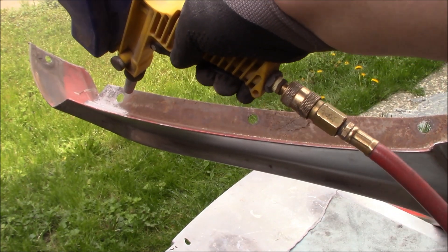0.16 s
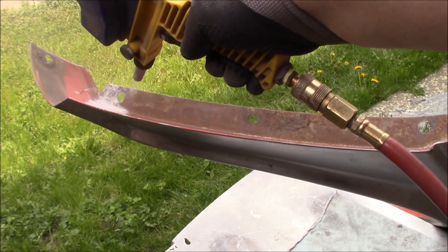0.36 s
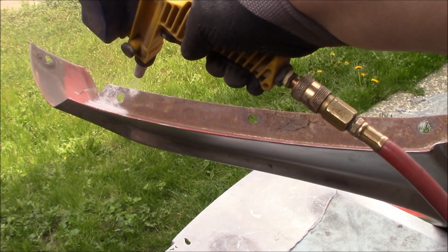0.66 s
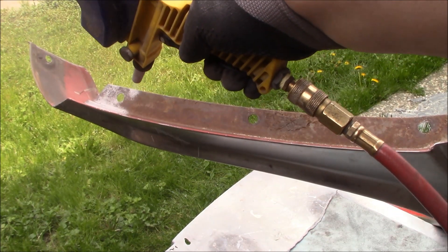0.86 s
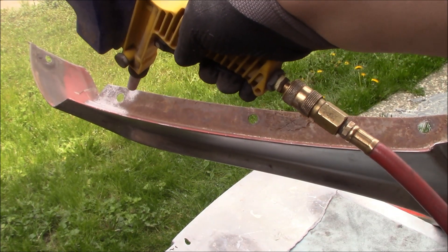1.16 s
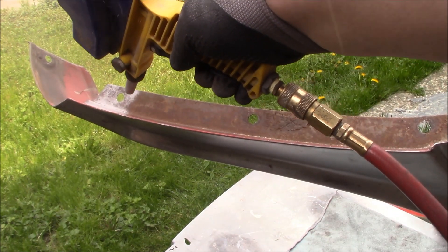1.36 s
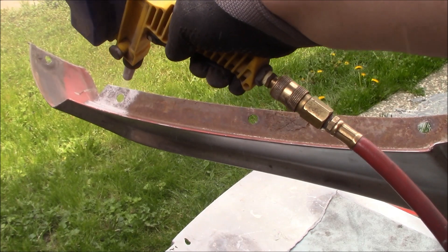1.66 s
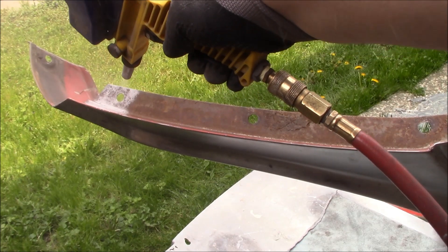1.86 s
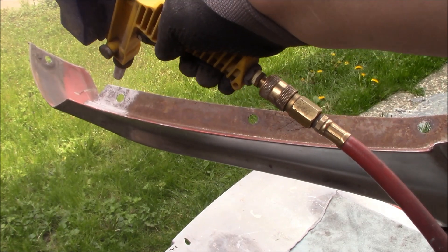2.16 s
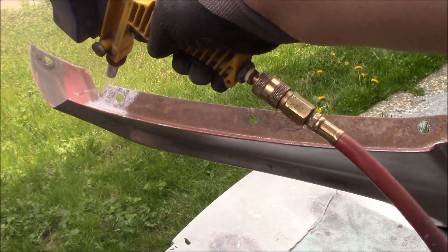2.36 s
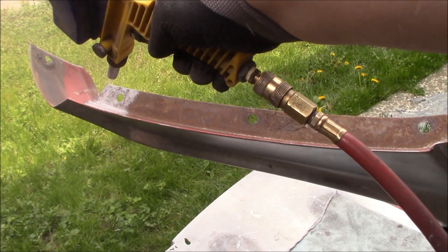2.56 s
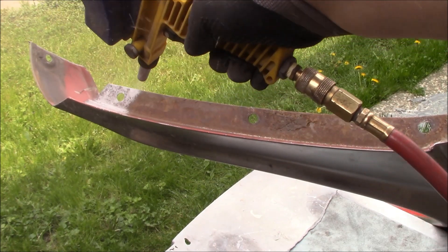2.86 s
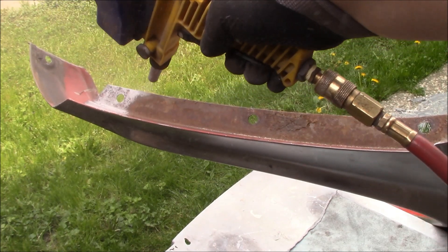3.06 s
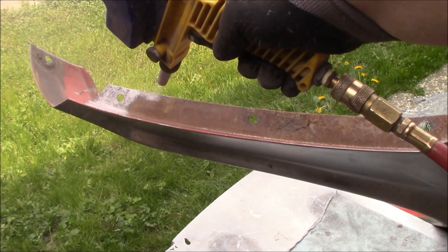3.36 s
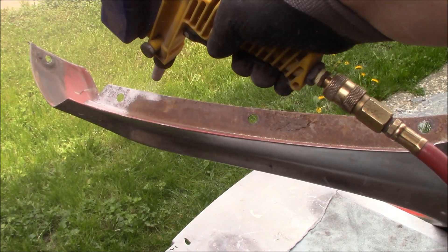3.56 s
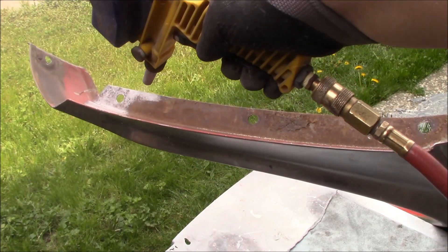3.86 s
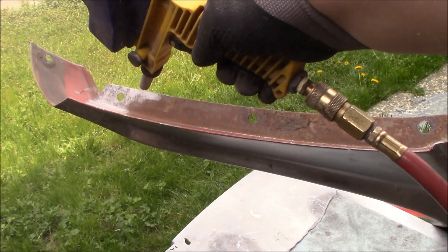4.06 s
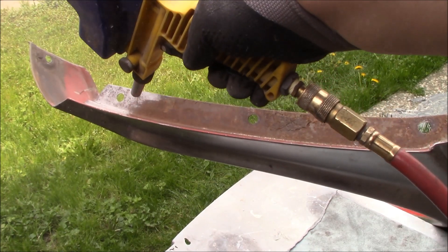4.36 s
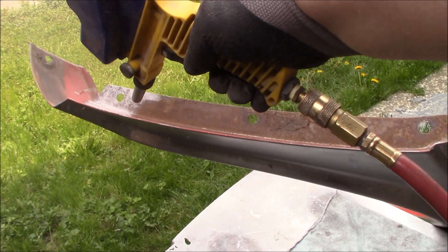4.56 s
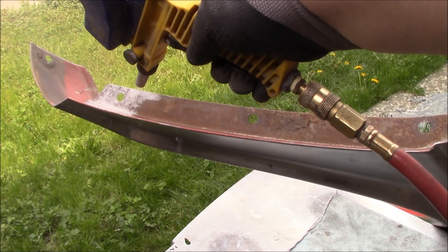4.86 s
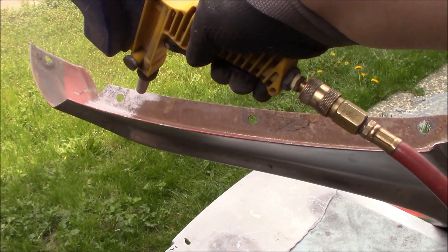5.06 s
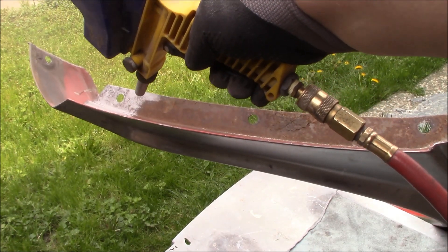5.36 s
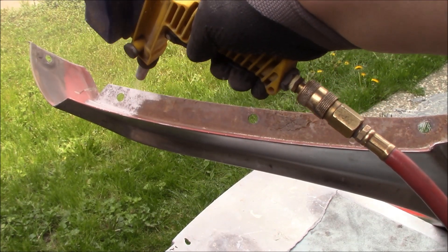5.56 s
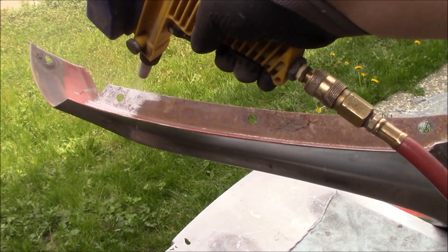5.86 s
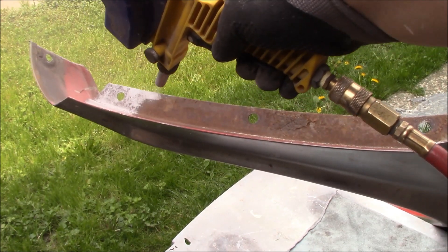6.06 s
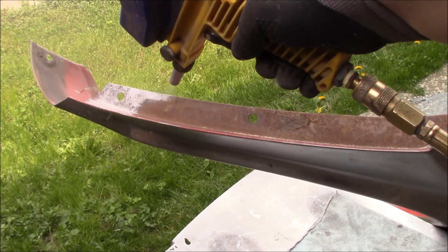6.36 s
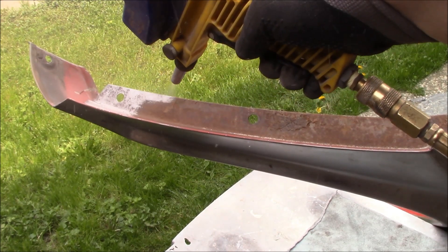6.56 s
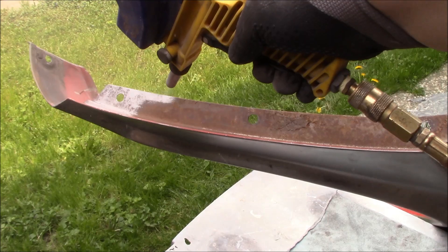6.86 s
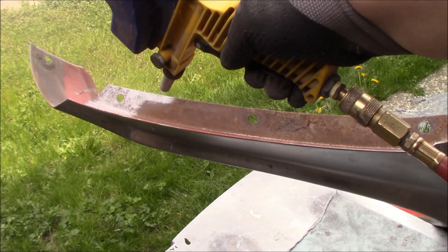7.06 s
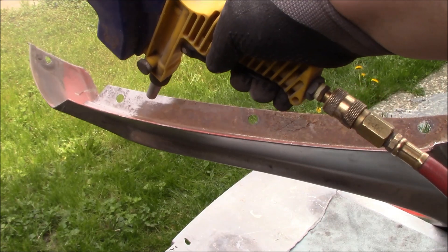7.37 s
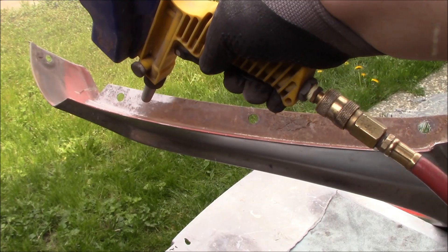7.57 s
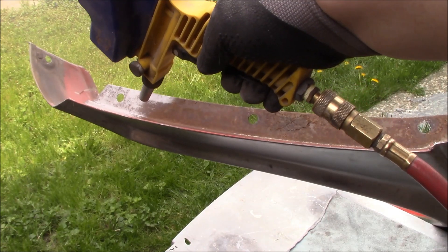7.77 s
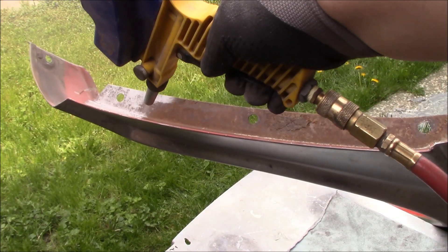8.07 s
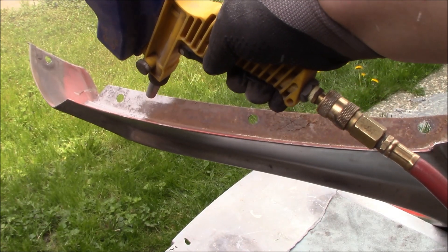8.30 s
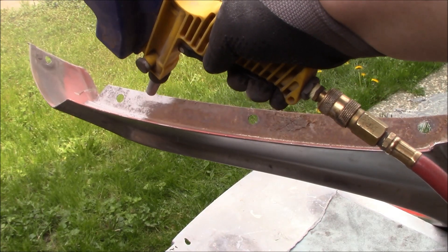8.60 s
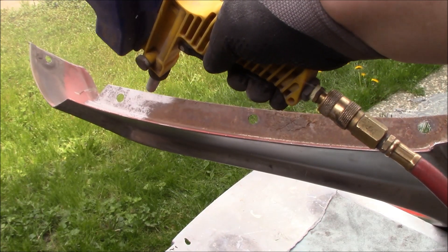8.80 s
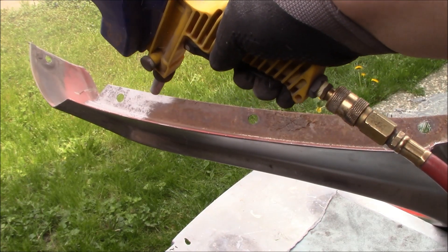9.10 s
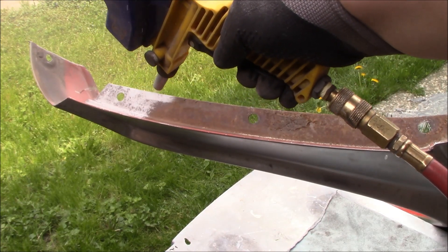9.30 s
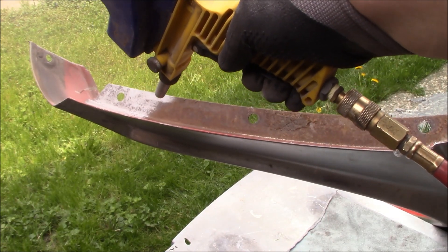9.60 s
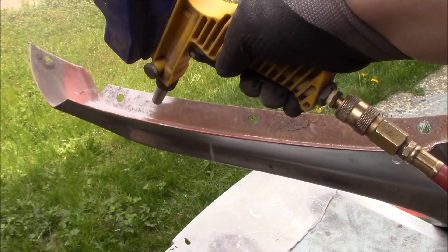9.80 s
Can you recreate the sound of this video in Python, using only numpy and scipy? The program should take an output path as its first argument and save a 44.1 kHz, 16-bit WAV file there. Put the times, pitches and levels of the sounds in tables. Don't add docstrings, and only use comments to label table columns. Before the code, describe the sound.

Loud continuous jet of compressed air with countless fine grit hits fused into a rasp on ringing sheet metal. Midrange roars surge and fall as the stream catches a folded edge, mostly in the first seven seconds; later the hiss and wash are more even. A faint low flutter pulses beneath. Outdoors, close stereo microphone, little audible space and slightly softened peaks.

```python
import sys
import numpy as np
from scipy import signal
from scipy.fft import rfft, irfft
from scipy.io import wavfile
from scipy.ndimage import uniform_filter1d

SR = 44100
rng = np.random.default_rng(int(sys.argv[2]) if len(sys.argv) > 2 else 0)


def persist_wave(psi):
    counts = np.round(np.clip(psi, -1, 1) * 32767).astype(np.int16)
    wavfile.write(sys.argv[1], SR, np.atleast_2d(counts).T)


def to_linear_factor(level_db):
    exponent = np.asarray(level_db, float) / 20
    return 10 ** exponent


N = 438354
HOP, SIZE = 128, 512

# (frequency [Hz], level [dB per Hz])
JET_COLOUR = [(2500, -33), (3700, -14.5), (4500, -7), (5100, -5.5), (6500, -6.5), (7600, -2), (8600, 1.3),
              (9700, 2), (10700, -1.5), (11400, -7.5), (13300, -7.5), (14300, -16), (14800, -22),
              (15700, -11)]
# (frequency [Hz], level [dB per Hz])
GRIT_COLOUR = [(25, -53), (60, -32), (150, -26.5), (300, -14), (500, -11.5), (800, -6), (1000, -0.5),
               (1500, -2.6), (2000, -1), (3000, -4.5), (4000, -8), (6000, -6.5), (16000, -50)]
# (frequency [Hz], width [Hz], level [dB])
PANEL_MODES = [(82, 14, 6), (109, 11, 2.5), (171, 36, 0), (223, 13.4, 7.5), (267, 45, -2), (341, 51, 1),
               (390, 42, 3), (513, 22, 3), (576.6, 9, 7), (638, 41, 0), (673, 61, 4), (815, 40, -6),
               (913, 87, 0.5), (988, 59, -5), (1123.5, 31, 4.5), (1223, 140, -2.5), (1358, 22, 3.5),
               (1492, 48, 4), (1599, 39, 4.5), (1808, 140, 1), (1882, 63, -4), (2087, 84, 0.5),
               (2176, 72, 1), (2397, 77, 5), (2590, 45, -4.5), (2704, 103, -2), (2912, 77, 4),
               (3084, 94, 0.5), (3294, 23, 2.5), (3444, 124, -0.5)]
# (frequency [Hz], width [Hz], level [dB])
GUN_MODES = [(3540, 260, 6), (3700, 90, 4.5), (4030, 58, -26), (4840, 190, -1), (5230, 130, -5.5),
             (5594, 135, -4.5), (6270, 110, -12.5), (6770, 75, -17), (7170, 69, -5)]
# (delay [ms], level [dB])
NEAR_ECHOES = [(.6, -23), (.84, -26), (1.08, -19), (1.81, -25), (2.29, -26), (4.1, -20), (4.3, -23),
               (5.01, -23), (6.97, -23)]
# (time [s], hiss level [dB], place on the panel [0 folded end to 1 flat part])
GUN_HOLD = [(0, -15, 0.51), (.35, -16, 0.27), (.9, -18.2, .1), (1.4, -18, 0), (1.6, -16.5, 0),
            (1.75, -20, 0.15), (2.22, -20, 0), (2.43, -16.2, 0.22), (2.78, -16.5, 0.21),
            (2.92, -18.5, 0.22), (3.3, -17, .8), (4.5, -16, 0.7), (5.9, -16.8, 0.54), (6.25, -15.4, 0.66),
            (7.1, -15.2, .7), (8, -15.5, 1), (9, -15, 0.72), (9.94, -14, 0.87)]
# (time [s], roar level [dB], rise [s], fall [s], part of the roar that reaches the whole panel [0 to 1])
EDGE_CATCHES = [(.33, -13.5, 0.18, 0.32, 0.53), (.68, -14, 0.55, 0.29, 0.56),
                (1.02, -12.5, 0.23, 0.4, 0.48), (1.61, -12, 0.17, 0.19, 0.5), (2.05, -15, 0.3, 0.22, 0.58),
                (2.74, -13, .03, 0.26, 0.68), (2.82, -15, 0.2, 0.08, 0.35), (2.92, -17.5, 0.12, 0.52, 0.29),
                (3.71, -15, 0.11, 0.066, .5), (3.89, -20.5, 0.21, 0.13, 0.28), (4.15, -24, .3, 0.19, 0.31),
                (4.4, -23.5, .3, 0.37, 0.47), (4.98, -16, 0.19, 0.12, 0.35),
                (5.35, -22.5, 0.45, 0.14, 0.35), (5.59, -16.5, 0.11, .3, 0.18),
                (5.72, -16, 0.18, .25, 0.68), (5.91, -13.5, 0.18, 0.092, 0.47), (6.32, -20, 0.13, 0.47, .4),
                (6.62, -18.5, 0.19, 0.12, 0.64), (6.86, -23, 0.12, 0.12, 0.25), (7.58, -28.5, .1, .4, 0.24),
                (7.84, -28.5, .2, 0.41, 0.41), (8.97, -26.5, 0.38, 0.16, 0.66),
                (9.36, -27.5, 0.19, 0.15, 0.83)]
# (middle time [s], length [s], extra bounce path [cm], extra bounce strength [gain])
HAND_LIFTS = [(0, 0.38, 1.2, 0.016), (1.092, 0.75, -0.7, 0.14), (1.5, 0.83, -1.26, 0.14),
              (1.957, 0.98, -1.17, .27), (2.523, 0.76, 0.85, 0.11), (2.95, 0.58, -.8, 0.19),
              (3.299, .4, -0.12, .05), (3.8, 0.9, 1.16, .22), (4.16, .25, .4, 0.13),
              (4.516, 0.78, 1.45, 0.11), (4.898, .25, 0.79, .15), (5.103, .2, -0.27, 0),
              (5.302, 0.19, -9, 0.013), (5.502, 0.23, -.6, 0.052), (5.853, 0.74, 2.0, 0.24),
              (6.66, 0.74, 0.67, 0.27), (7.002, 0.57, 0.86, 0.14), (7.302, 0.24, .3, .15),
              (7.693, 0.9, 1.4, 0.039), (8.27, .45, -.55, 0.039), (8.663, .4, 0.45, 0.13),
              (8.93, 0.24, 0.7, .15), (9.125, .25, 0.9, 0.13), (9.403, 0.21, 0.55, 0.15),
              (9.52, .15, 0.38, .05), (9.64, .15, 0.86, .2), (9.852, .35, 2.1, 0.1)]
# (frequency [Hz], level [dB])
LEFT_RIGHT = [(60, -45), (150, -12), (400, -29), (1200, -28), (2400, -14), (4200, -18.5), (6200, -10.5),
              (8000, -16.5), (10000, -20), (12000, -12.5), (15000, -15)]

REST_CM, REST_BOUNCE = 6.23, 0.2
BRISK = 1.07
BRIGHT_DB, DULL_PER_GRIT, MEAN_GRIT_DB = 0.75, 0.43, -27
GRIT_FOLD_DB, GRIT_FLAT_DB = -34, -27.5
IDLE_ROAR_DB = -29
ROAR_FOLD_HZ, ROAR_FLAT_HZ, ROAR_HZ_PER_DB = 2390, 2030, 12.5
WASH_FLAT_DB = 2.5
THROB_HZ, THROB_DEPTH = 91.5, 0.043
LEAN_DB = 0.6
LOW_CUT_HZ, TOP_HZ = 65, 15735


def jet():
    hz, t, z = frames(hail(30000, 0.45))
    jet_db = columns(GUN_HOLD, t)[0]
    grit_db = stream(t)[0]
    bright_db = BRIGHT_DB - DULL_PER_GRIT * (grit_db - MEAN_GRIT_DB)
    tilt_db = bright_db * np.log2((hz + 1) / 9000)
    path_cm, strength = nozzle(t)
    mirror = np.clip((hz - 4000) / 6000, 0.2, 1.3)
    mirror = mirror * np.clip((22000 - hz) / 8500, 0.3, 1)
    late = np.exp(-2j * np.pi * hz * path_cm / 34300)
    again = 0.045 * mirror
    bounce = np.clip(strength * mirror, 0, 0.7) * late / (1 + again * late)
    comb = abs(1 + bounce)
    flicker_db = patches(z.shape, 0.75)
    streaks_db = patches(z.shape, 1.0, tall=2, wide=87)
    motion = comb * to_linear_factor(tilt_db + flicker_db + streaks_db)
    hiss = shaped(z, motion, JET_COLOUR, hz, (4500, 15000), jet_db)
    f = np.fft.rfftfreq(N, 1 / SR)
    echoes = 1 - sum(to_linear_factor(db) * np.exp(-2j * np.pi * f * ms / 1000) for ms, db in NEAR_ECHOES)
    return irfft(hiss * echoes * (to_linear_factor(-0.5) + modes(GUN_MODES)), N)


def nozzle(t):
    at, length, extra_cm, extra = np.transpose(HAND_LIFTS)[:, :, None]
    turn = np.pi * np.clip((t - at) / length, -0.5, 0.5)
    swing = np.minimum(BRISK * np.cos(turn) ** 2, 1)
    return REST_CM + (extra_cm * swing).sum(0), REST_BOUNCE + (extra * swing).sum(0)


def steel():
    hz, t, z = frames(hail(20000, 0.8))
    grit_db, edge_db, edge_hz = stream(t)
    octaves = np.log2((hz + 1) / edge_hz)
    hump = 0.77 * np.exp(-(octaves / 0.36) ** 4) + 0.5 * np.exp(-(octaves / 1.18) ** 4)
    shoulder = 0.5 * np.exp(-((octaves - 0.75) / 0.3) ** 2)
    roar_db = (edge_db - grit_db - 0.5) * (hump + shoulder)
    steady = np.clip(np.log2(700 / (hz + 1)), 0, 1) * 1.2
    place = columns(GUN_HOLD, t)[1]
    wash_db = WASH_FLAT_DB * steady * (place - 0.5)
    spot_db = patches(z.shape, 1.17, tall=2, wide=188)
    flicker_db = patches(z.shape, 0.41)
    motion = to_linear_factor(wash_db + roar_db + flicker_db + spot_db * (1 - steady))
    drive = shaped(z, motion, GRIT_COLOUR, hz, (700, 1700), grit_db, steady)
    return irfft(drive * (to_linear_factor(-6.0) + modes(PANEL_MODES) * to_linear_factor(-3)), N)


def stream(t):
    place = np.clip(columns(GUN_HOLD, t)[1], 0, 1.2)
    at, peak_db, rise, fall, share = np.transpose(EDGE_CATCHES)[:, :, None]
    away = np.where(t < at, (at - t) / rise, (t - at) / fall)
    power = to_linear_factor(2 * peak_db - 20 * away) + 1e-20
    edge_db = 10 * np.log10(to_linear_factor(2 * IDLE_ROAR_DB) + power.sum(0))
    over_db = edge_db - IDLE_ROAR_DB
    spread = (share * power).sum(0) / power.sum(0)
    grit_db = GRIT_FOLD_DB + (GRIT_FLAT_DB - GRIT_FOLD_DB) * place + over_db * spread
    edge_hz = ROAR_FOLD_HZ + (ROAR_FLAT_HZ - ROAR_FOLD_HZ) * place + ROAR_HZ_PER_DB * over_db
    return grit_db, edge_db, edge_hz


def throb():
    drift = uniform_filter1d(rng.standard_normal(N), 20000)
    turns = np.cumsum(THROB_HZ + 0.37 * drift / drift.std()) / SR
    return 1 + THROB_DEPTH * (np.cos(2 * np.pi * turns) + 0.5 * np.cos(4 * np.pi * turns))


def hail(per_s, spread_db):
    size = to_linear_factor(spread_db * np.minimum(rng.exponential(1, N), 5)) * rng.standard_normal(N)
    hits = size * (rng.random(N) < per_s / SR)
    return hits / hits.std()


def modes(table):
    f = np.fft.rfftfreq(N, 1 / SR)
    return sum(to_linear_factor(db) * width / (width + 2j * (f - hz)) for hz, width, db in table)


def patches(shape, patchy_db, tall=6, wide=20):
    field = uniform_filter1d(rng.standard_normal(shape), int(tall), 0)
    field = uniform_filter1d(field, int(wide), 1)
    return patchy_db * field / field.std()


def shaped(drive, motion, colour, hz, band, level_db, steady=0):
    inside = (hz > band[0]) & (hz < band[1])
    band_rms = np.sqrt(((motion * to_linear_factor(read(colour, hz)) * inside) ** 2).mean(0))
    hold_db = level_db - 20 * np.log10(band_rms)
    hold_db = hold_db - steady * (hold_db - hold_db.mean())
    moved = unframe(drive * motion * to_linear_factor(hold_db))
    return rfft(moved) * to_linear_factor(read(colour, np.fft.rfftfreq(N, 1 / SR)))


def frames(x):
    hz, t, z = signal.stft(x, SR, nperseg=SIZE, noverlap=SIZE - HOP)
    return hz[:, None], t, z


def unframe(z):
    return signal.istft(z, nperseg=SIZE, noverlap=SIZE - HOP)[1][:N]


def read(points, hz):
    f, value = np.transpose(points)
    return np.interp(np.log(hz + 1), np.log(f + 1), value)


def columns(rows, t):
    s, *rest = np.transpose(rows)
    return [np.interp(t, s, c) for c in rest]


def scene():
    mid = (jet() + steel()) * throb()
    scatter = rfft(rng.standard_normal(1500), N)
    scattered = irfft(rfft(mid) * scatter / abs(scatter), N)
    hz, t, z = frames(scattered)
    quick_db = patches(z.shape, 6.3, tall=5.4, wide=8.3)
    slow_db = patches(z.shape, 1.1, tall=10, wide=100)
    side = 0.48 * unframe(z * to_linear_factor(read(LEFT_RIGHT, hz) + quick_db + slow_db))
    return np.array([mid + side, mid - side]) * to_linear_factor([[LEAN_DB / 2], [-LEAN_DB / 2]])


def roll_off(x):
    return signal.sosfilt(signal.butter(12, 15990, fs=SR, output="sos"), x)


def record(dry):
    held = 1.05 * np.tanh(dry / 1.05)
    f = np.fft.rfftfreq(N, 1 / SR)
    band = (f < TOP_HZ) * f ** 2 / np.sqrt(f ** 4 + LOW_CUT_HZ ** 4)
    mix = irfft(rfft(held) * band, N)
    return roll_off(mix)


dry = scene()
out = record(dry)
persist_wave(out)
```